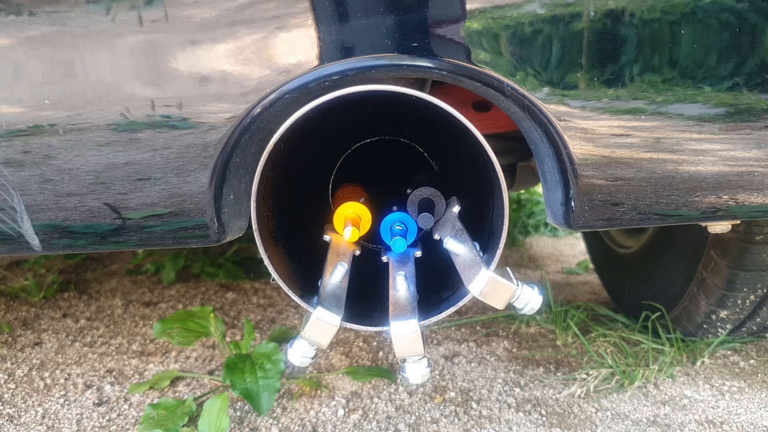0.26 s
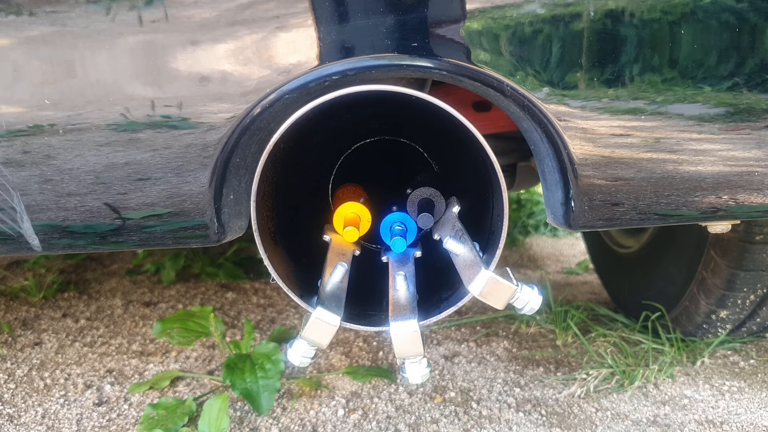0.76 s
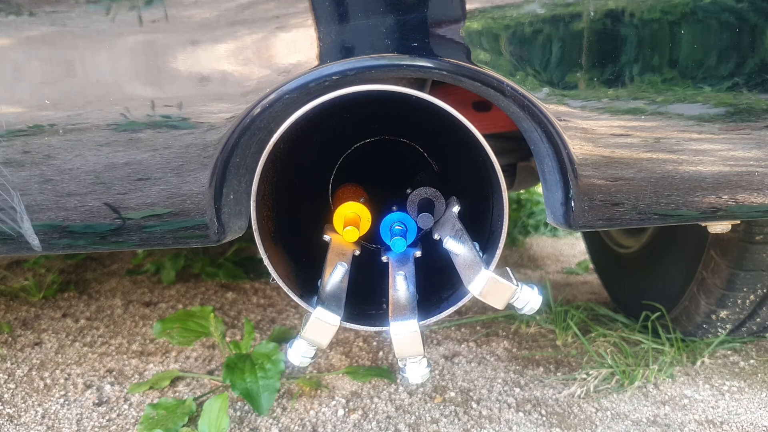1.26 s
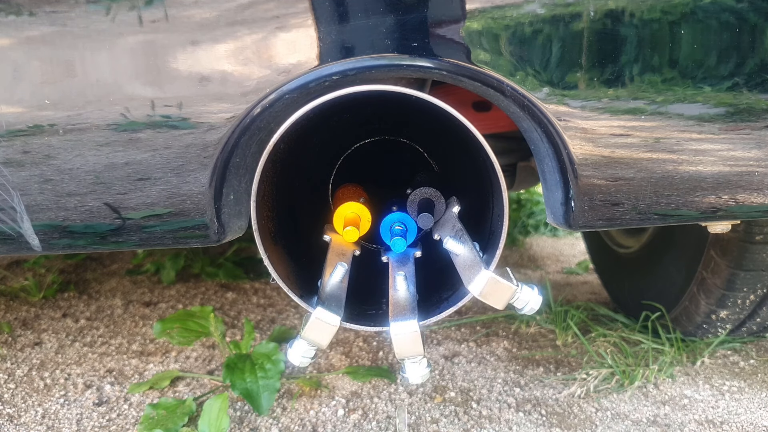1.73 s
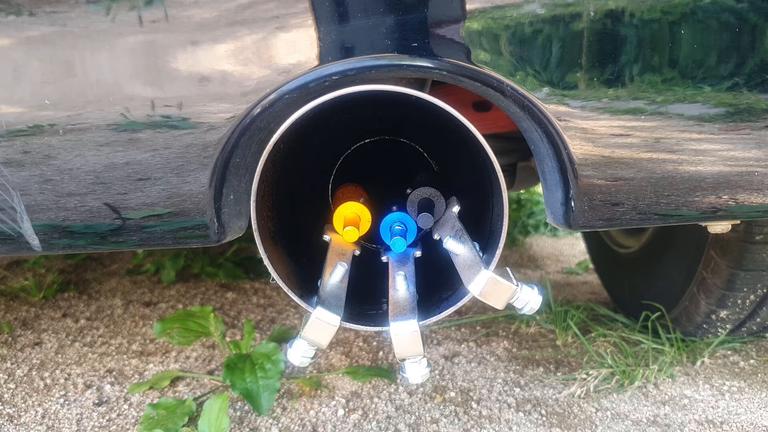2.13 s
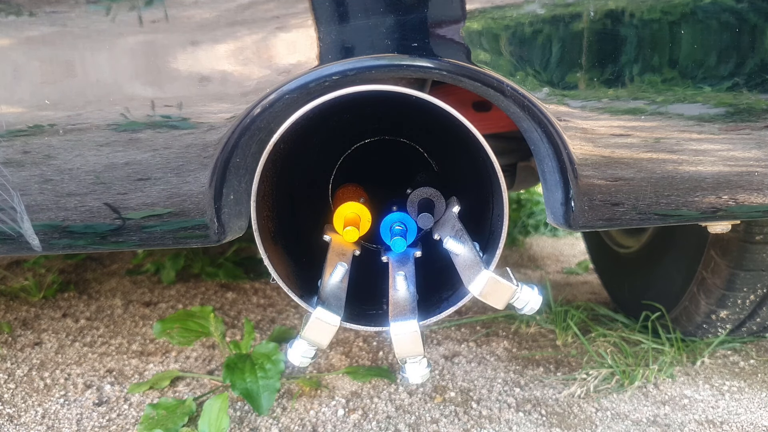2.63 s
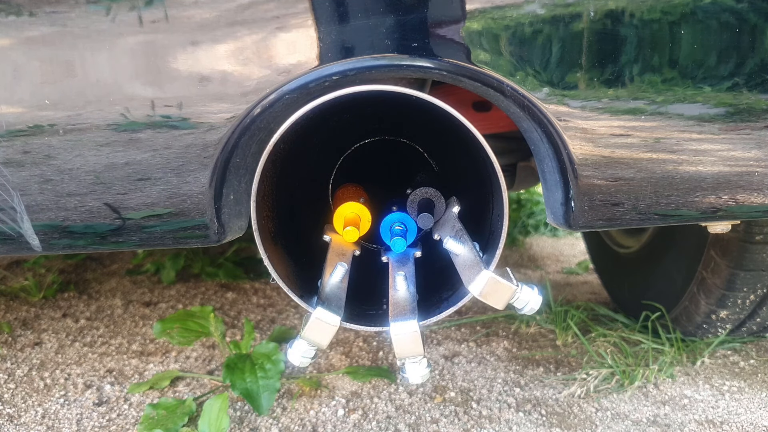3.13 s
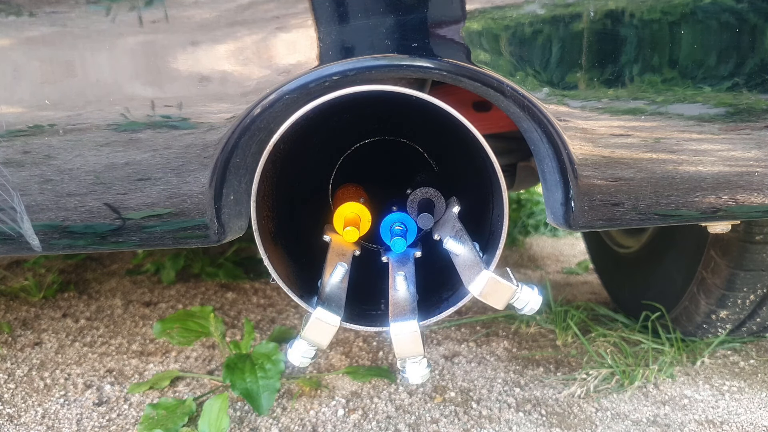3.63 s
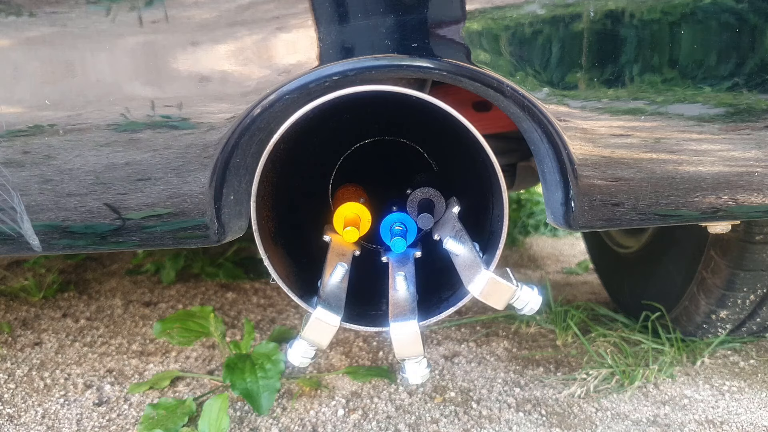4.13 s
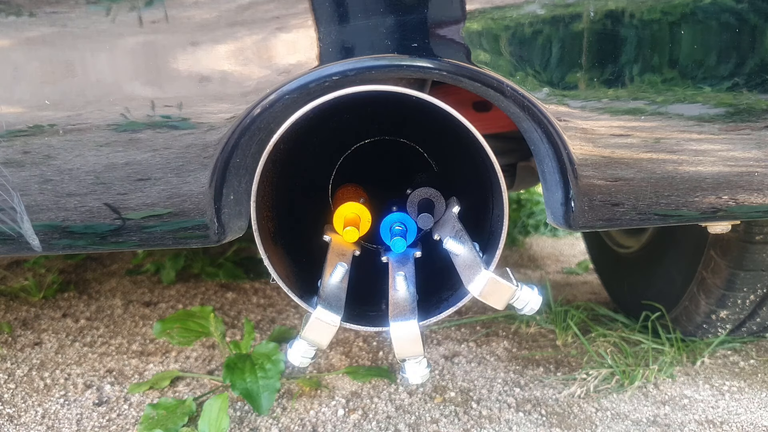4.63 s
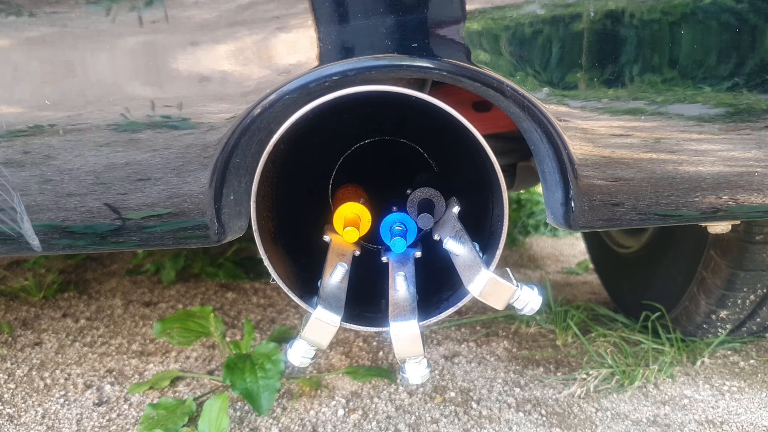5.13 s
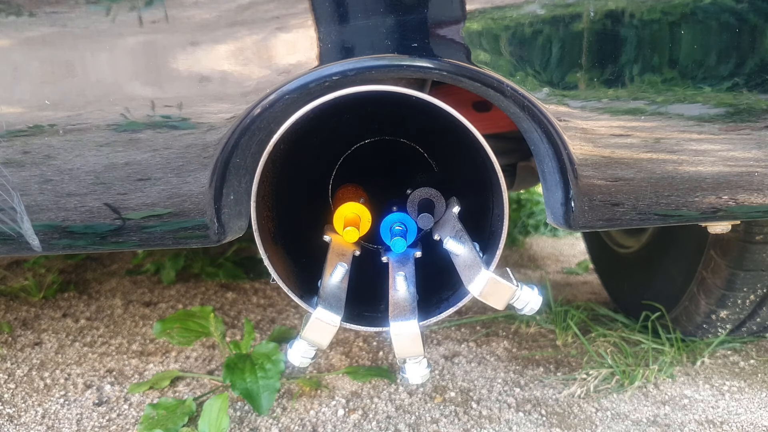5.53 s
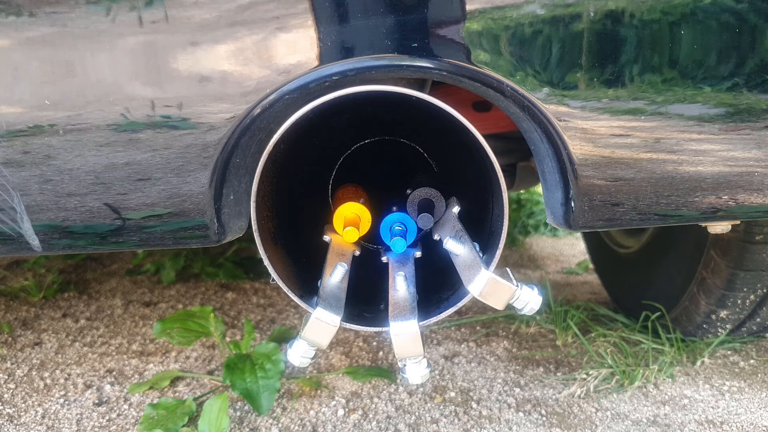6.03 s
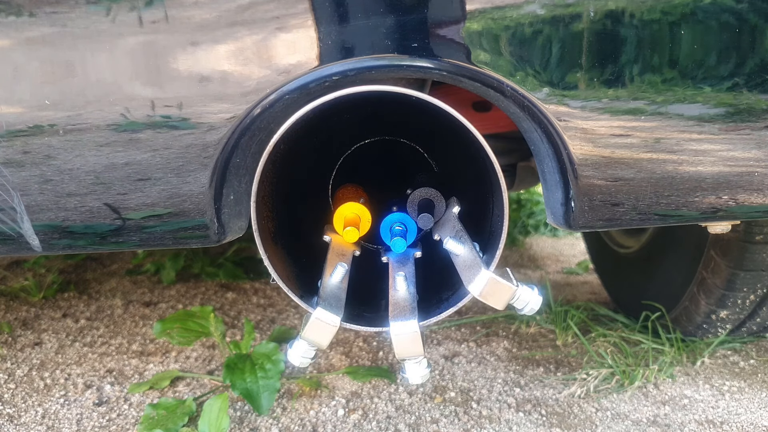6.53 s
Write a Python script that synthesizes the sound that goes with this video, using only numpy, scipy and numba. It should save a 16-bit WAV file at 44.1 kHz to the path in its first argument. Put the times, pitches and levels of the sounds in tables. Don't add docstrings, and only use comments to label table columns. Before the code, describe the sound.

A parked four-cylinder engine drops off a rev, idles with small birds chirping, then revs up hard as metal whistle inserts hiss and jingle in the tailpipe.

```python
import sys
import numpy as np
from scipy import signal
from scipy.fft import rfft, irfft, next_fast_len
from scipy.io import wavfile
from scipy.ndimage import uniform_filter1d
from numba import njit

SR = 44100
rng = np.random.default_rng(int(sys.argv[2]) if len(sys.argv) > 2 else 0)


def rack_gain(trim_db):
    fader = np.asarray(trim_db, float)
    return 10 ** (fader / 20)


def master_out(mix):
    frames = np.transpose(np.atleast_2d(mix))
    ceiling = np.clip(frames, -1, 1)
    pcm = np.round(ceiling * 32767).astype(np.int16)
    wavfile.write(sys.argv[1], SR, pcm)


N = 298557
T = np.arange(N) / SR


def curves(rows):
    s, *columns = np.transpose(rows)
    return [np.interp(T, s, column) for column in columns]


def over_hz(points, hz):
    f, v = np.transpose(points)
    return np.interp(np.log(hz), np.log(f), v)


def unit(x):
    return x / np.sqrt(np.mean(x ** 2))


@njit
def moving_bandpass(x, hz, width):
    y, band, low = np.empty(len(x)), 0., 0.
    for i in range(len(x)):
        g, damping = np.tan(np.pi * hz[i] / SR), width / hz[i]
        v = (band + g * (x[i] - low)) / (1 + g * (g + damping))
        band = 2 * v - band
        low = low + 2 * g * v
        y[i] = damping * v
    return y


def walk(rate):
    k = int(SR / rate)
    steps = np.repeat(rng.standard_normal(N // k + 1), k)
    return unit(uniform_filter1d(uniform_filter1d(steps, k), k)[:N])


def resonate(hz, modes, signs):
    total = 0
    for (f, width, db), sign in zip(modes, signs):
        loss = 1j * hz * width
        total = total + sign * rack_gain(db) * loss / (f * f - hz * hz + loss)
    return total


def ring(x, modes, signs):
    size = next_fast_len(N + SR)
    response = resonate(np.fft.rfftfreq(size, 1 / SR), modes, signs)
    return irfft(rfft(x, size) * response, size)[:N]


def pan(x, db):
    return x * rack_gain(np.array([[db], [-db]]) / 2)


def fit(s, held, db, rise, fall):
    return rack_gain(db + np.interp(T, [s - 2 * rise, s, s + held, s + held + 2 * fall], [-70, 0, 0, -70]))


# time [s], firing rate [Hz].
ENGINE_SPEED = [(0, 44.8), (.17, 42.1), (.53, 40.1), (1.28, 33.5), (1.68, 31.1), (2.09, 31.1), (2.5, 32.9),
                (3.36, 33.3), (3.64, 38.9), (4.13, 50.6), (4.6, 62.3), (5.03, 77.7), (5.26, 84.6),
                (5.47, 90.6), (5.64, 93.8), (5.88, 98.4), (6.3, 103.1), (6.77, 106.2)]


def firings():
    hz, = curves(ENGINE_SPEED)
    return hz, np.cumsum(hz) / SR + 0.1468


# time [s], load [dB], extra edge of the blowdown [dB].
THROTTLE = [(0, 2.5, -5.5), (.08, -2, -1), (.13, -7, -5), (.45, -5.5, -17.5), (.7, -6.5, -13.5),
            (.9, -8, -9.5), (1.15, -9.5, -6), (1.75, -9, -5), (2.1, -6, -4), (2.45, 0.1, -4),
            (3.33, -0.8, -1), (3.55, 0, 4.5), (3.82, 1, -2.5), (3.92, 0.5, 2), (5.25, -0.86, 7.5),
            (5.5, -0.6, 2.1), (6.25, -0.1, -3.5), (6.77, 3, -1.5)]
# pitch [Hz], level [dB].
FIRST_ORDER = [(31, -27.5), (35, -21), (41, -14), (47, -16.5), (55, -16.5), (70, -11.5), (82, -12),
               (100, -18)]
# pitch [Hz], level [dB].
SECOND_ORDER = [(62, -19), (77, -20.5), (84, -25), (100, -26.5), (122, -28.5), (156, -22.5), (185, -30.5),
                (205, -40)]
# pitch [Hz], level [dB].
THIRD_ORDER = [(99, -30.5), (108, -29), (132, -28.5), (150, -24), (202, -47.5), (254, -42.5), (276, -43.5),
               (318, -32.5)]
EDGE_SHARE = [0, 0.49, 0.78]
HIGH_ORDER_DB = [1.5, 0, -4.5, -4.5, -1, -4.5, -7, -12, -11.5, -30, -26, -13.5, -15.5, -22.5, -30.5, -13,
                 -32]
HALF_ORDER_DB = [-20, -24, -20, -18, -16, -18, -20, -22, -23, -24, -25, -26]
# pitch [Hz], width [Hz], level [dB].
PIPE = [(44.5, 11, 0.5), (69, 16.1, 5.5), (108.6, 26.3, 1.5), (152.3, 22.4, 0), (242, 43, -18),
        (324, 52, -10), (410.8, 26.2, 0.5), (611, 30.3, -11.5), (770, 15, -36), (974, 80, -25),
        (1070, 39, -45), (1310, 84, -32), (1863, 110, -21)]
PIPE_SIGN = [1, -1, 1, -1, -1, 1, -1, -1, 1, -1, 1, -1, 1]
# pitch [Hz], width [Hz], depth [dB].
TRAPS = [
    (234, 50, -6.5),
    (493, 100, -12.5),
    (787, 230, 2.5),
]
# pitch [Hz], phase [turns].
PIPE_LAG = [(34, 0.47), (38, 0.37), (46, 0.01), (62, -0.07), (80, -0.28), (105, -0.3), (135, -0.2),
            (170, -0.48), (200, -0.68), (240, -0.76), (300, -0.21), (385, -0.53), (440, -0.99), (650, -1.0)]


def exhaust(hz, turns):
    load_db, edge_db = curves(THROTTLE)
    grid = np.arange(5, 2500, .5)
    pipe = resonate(grid, PIPE, PIPE_SIGN) * (1 - resonate(grid, TRAPS, [1, 1, 1]))
    gain, lag = np.abs(pipe), 2 * np.pi * over_hz(PIPE_LAG, grid)
    timing = turns + .016 * (33 / hz) ** 2 * walk(25)

    def line(k):
        return np.sqrt(2) * np.cos(2 * np.pi * k * timing + np.interp(k * hz, grid, lag))

    out = np.zeros(N)
    low_orders = zip([1, 2, 3], [FIRST_ORDER, SECOND_ORDER, THIRD_ORDER], EDGE_SHARE)
    for k, passed, share in low_orders:
        db = load_db + share * edge_db + over_hz(passed, k * hz)
        out += rack_gain(db + 0.11 * k * walk(13)) * line(k)

    sharp_db = -27.5 + load_db + edge_db
    whole = [(k + 4, db, .8) for k, db in enumerate(HIGH_ORDER_DB)]
    halves = [(k + .5, db + 11.4 * (hz - 60) / 40, 4.2) for k, db in enumerate(HALF_ORDER_DB)]
    for k, db, flutter_db in whole + halves:
        out += rack_gain(sharp_db + db + flutter_db * walk(22)) * np.interp(k * hz, grid, gain) * line(k)

    locked = line(9) + rack_gain(-14) * line(10) + rack_gain(-12) * line(7) + rack_gain(-17) * (line(14) + line(18))
    out += rack_gain(-38 + 2.6 * (hz - 106) + 1.2 * walk(10)) * locked

    octaves = np.log2(hz / 33)
    puff = np.exp(-(turns % 1) / 1.3) * rng.standard_normal(N)
    floor_pan = [(207, 46, -2), (251.0, 40, -1), (568, 56, -4.5)]
    boom = unit(ring(rng.standard_normal(N), floor_pan, [1, -1, 1]))
    uneven = unit(ring(puff, PIPE, PIPE_SIGN)) + rack_gain(-9.5 - 3.7 * octaves) * boom
    return out + uneven * rack_gain(-41 + load_db + 5.5 * octaves)


# start [s], held [s], level [dB].
JINGLE = [
    [(0.0, 0.31, -65), (.29, .44, -61.5), (3.72, 0.35, -62), (5.09, .2, -71)],
    [(.27, 0.17, -60), (.48, 0.16, -67), (3.865, .135, -56), (5.1, .1, -71)],
    [(0.0, .1, -72), (.32, 0.37, -63.5), (3.8, .06, -69), (3.865, .16, -57), (4.33, .08, -71),
     (5.09, 0.084, -58.5)],
]


def shaking():
    return [sum(fit(*row, rise=0.06, fall=.07) for row in fits) for fits in JINGLE]


# time [s], level [dB].
FLOW = [(0, -61.5), (.02, -57.5), (.17, -63), (.47, -59), (.94, -62.5), (1.98, -58), (2.2, -52.5),
        (2.45, -49), (3.56, -51), (3.85, -55.5), (4.2, -53), (5.02, -51), (5.13, -47), (5.3, -46),
        (5.64, -44), (6.3, -42.5), (6.77, -38)]
# pitch [Hz], density [dB per Hz].
GAS_COLOUR = [(290, -38), (500, -8), (603, 1), (851, -4), (1070, 4), (1330, -22.5), (1880, -24.5),
              (2230, -17), (3580, -16.5), (5440, -26.5), (6280, -26), (7900, -8), (15500, -6.5)]
# pitch [Hz], correlation [-1 to 1].
LIKENESS = [(60, 0.99), (130, 0.99), (290, 1), (640, 0.31), (1410, 0.42), (3100, 0.14), (6820, -0.61),
            (15000, -0.43)]
# pitch [Hz], left minus right [dB].
LEFT_LEAN = [(60, 1.5), (110, 1.5), (200, 2.0), (380, 1.5), (700, 1.4), (1290, 4.6), (2380, 2.5),
             (4400, 5.8), (8120, 7.2), (15000, 1.5)]


def gas(turns):
    hiss_db, = curves(FLOW)
    over = hiss_db + 50.5
    roar_db = -53 + 0.89 * over + 0.38 * curves(THROTTLE)[1]
    top_db = -79 + np.where(over < 0, 3.9, 1.31) * over
    top_db = 20 * np.log10(rack_gain(top_db) + rack_gain(-20.5) * sum(shaking()))
    throb, swell, out = 1 + 0.062 * np.cos(2 * np.pi * turns), walk(3.22), 0
    # level, start of the bands, range that sets the level, end of the bands (Hz)
    groups = [(roar_db, 560, 700, 1300, 1500),
              (hiss_db, 1500, 2100, 6800, 7000),
              (top_db, 7000, 9600, 10200, 15600)]
    for flow_db, start, lo, hi, end in groups:
        total_db = 10 * np.log10(np.sum(rack_gain(2 * over_hz(GAS_COLOUR, np.arange(lo, hi)))))
        edges = np.geomspace(start, end, 6)
        for a, b in zip(edges, edges[1:]):
            centre = (a + b) / 2
            band = signal.butter(3, [a, b], "band", fs=SR, output="sos")
            mid, side = signal.sosfilt(band, rng.standard_normal((2, N)))
            like = np.clip(over_hz(LIKENESS, centre), 0, 1)
            opposed = unit(side) * np.array([[1], [-1]])
            pair = np.sqrt(1 + like) * unit(mid) + np.sqrt(1 - like) * opposed
            db = over_hz(GAS_COLOUR, centre) + 10 * np.log10(b - a) - total_db
            db = db + max(np.log2(a / 9000), 0) * .3 * (top_db + 71.5)
            gain = rack_gain(flow_db + db + 0.62 * swell + 0.97 * walk(15))
            out = out + pan(pair, over_hz(LEFT_LEAN, centre)) * gain
    return out * throb * rack_gain(-4.0)


# pitch [Hz], width [Hz], level [dB].
AIR_COLUMNS = [(872, 9, 6), (1290, 40, -4), (1470, 22, 1), (1930, 40, 0), (2440, 60, -1), (2620, 60, -2),
               (3340, 40, -3), (3670, 90, -3), (5000, 80, -7), (6270, 70, -4)]


def air_columns():
    hiss_db = curves(FLOW)[0]
    ports = []
    for _ in range(2):
        air = rng.standard_normal(N) * rack_gain(3.3 * walk(18))
        ports.append(unit(ring(air, AIR_COLUMNS, np.ones(len(AIR_COLUMNS)))))
    return pan(np.array(ports), 5.2) * rack_gain(hiss_db - 6)


# start [s], held [s], pitch [Hz], level [dB].
BREATH = [
    (0.0, .12, 1390, -62),
    (.35, 0.39, 1370, -62),
    (3.5, .8, 1570, -60.5),
    (3.97, 0.034, 1400, -54),
    (4.751, .6, 1660, -47.5),
    (5.499, 1.3, 1937, -51.5),
]


def whistles(turns):
    out = np.zeros((2, N))
    for s, held, centre_hz, db in BREATH:
        hz = centre_hz * (1 + 0.011 * walk(8))
        air = rng.standard_normal((2, N)) * (1 + 0.1 * np.cos(2 * np.pi * turns))
        ports = []
        for a in [air[0], 0.48 * air[0] + 0.98 * air[1]]:
            ports.append(unit(moving_bandpass(a, hz, 90.) + 0.26 * moving_bandpass(a, hz, 500.)))
        out += np.array(ports) * fit(s, held, db, rise=0.38, fall=0.25) * rack_gain(1.1 * walk(20))
    return pan(out, 4.8)


# pitch [Hz], width [Hz], level [dB].
INSERT_MODES = [(6270, 60, 0), (12090, 40, 0), (8910, 28, 2), (4980, 70, -5), (12380, 70, -4),
                (8080, 40, -7), (9390, 50, -2), (11100, 50, -9), (7460, 50, -14), (10380, 55, -8),
                (13000, 60, -13), (8240, 60, -7), (15000, 110, -17), (13800, 80, -15)]
# time [s], peak [dB], pitch [Hz].
SPITS = [
    (0.0464, -53.5, 1720),
    (0.0687, -45, 1280),
    (0.0922, -34, 1300),
    (0.1154, -34.5, 1360),
    (0.165, -55, 1350),
]


def inserts(turns):
    beat = np.exp(-((turns + .3) % 1) / 0.28)
    out = 0
    for k, (left_db, shake) in enumerate(zip([5., 1.5, -1.5], shaking())):
        struck = rng.random((3, N)) < 500 * beat / SR
        taps = struck * rng.standard_normal((3, N)) * rack_gain(1.2 * walk(11))
        modes = INSERT_MODES[k::3] + [(10500, 5800, -28)]
        signs = (-1.) ** np.arange(len(modes))
        ports = [ring(0.61 * taps[0] + side, modes, signs) for side in taps[1:]]
        out = out + pan(unit(np.array(ports)), left_db) * shake
    for s, db, hz in SPITS:
        burst = np.exp(-((T - s - .003) / 0.0056) ** 2) * rng.standard_normal(N)
        metal = [(1700, 500, 0), (hz, 900, -3), (5000, 1200, -3), (3000, 900, -7)]
        slap = ring(burst, metal, [1, -1, 1, -1])
        out += pan(slap / np.abs(slap).max() * rack_gain(db - 4.0), 3.7)
    return out


# pitch [Hz], width [Hz], level [dB].
DRONES = [
    (249.2, 3.5, -52.5),
    (411, 4.7, -56.5),
    (868, 1.5, -67.5),
    (1446, 12, -76),
    (58, 37, -52.5),
    (105, 50, -55),
]


def drones(hz):
    swell_db = 7.36 + 1.2 * curves(THROTTLE)[0] - 1.07 * np.clip(hz - 35, 0, 17)
    hums = [rack_gain(db) * unit(ring(rng.standard_normal(N), [(f, width, 0)], [1])) for f, width, db in DRONES]
    return pan(sum(hums) * rack_gain(swell_db), 3.6)


# time into the call [s], level [dB], pitch [Hz], length [s].
PHRASE = [
    (0, -1, 4110, 0.015),
    (.009, 0, 3960, 0.011),
    (0.028, -7, 4180, 0.015),
]
# start [s], peak [dB], left minus right [dB].
CALLS = [
    (2.459, -38, 9),
    (3.418, -38.5, 7.3),
]
# start [s], peak [dB], pitch [Hz], length [s], left minus right [dB].
CHIRPS = [
    (2.359, -49, 5450, 0.03, 8),
    (2.40, -58, 5700, 0.018, 8),
    (2.42, -54, 5420, .014, 6),
    (2.47, -54, 6150, 0.019, 10),
    (2.497, -45, 3110, .018, .1),
    (3.438, -46.5, 2890, .025, 2.1),
    (4.06, -56, 3700, 0.022, 6),
    (4.222, -61, 3400, .035, 2),
    (4.29, -48.5, 3810, .016, 5),
    (4.424, -55, 3660, .041, 17),
]
# time [s], peak [dB], pitch [Hz].
TICKS = [(0.2139, -63, 3520), (0.8235, -59, 3600), (1.279, -56, 3650), (1.4022, -61, 3670),
         (1.7823, -64, 3670), (1.9101, -61, 3550), (2.295, -59, 3680), (2.409, -57, 3630),
         (2.517, -53, 3600), (2.537, -52, 3660), (2.6943, -59, 3870), (2.7826, -53, 3660),
         (2.9033, -47, 3720), (3.0664, -54, 3740), (3.1448, -52, 3700), (3.2675, -51, 3730),
         (3.389, -49, 3570), (3.684, -55, 3730), (3.807, -51.5, 3670), (4.148, -67, 3740),
         (4.37, -49, 3670), (4.509, -57, 3630), (4.6962, -57, 3560), (4.8135, -50, 3600)]


def birds():
    out = np.zeros((2, N + SR))
    called = [(s + after, db + rel_db, hz, length, left_db)
              for s, db, left_db in CALLS for after, rel_db, hz, length in PHRASE]
    notes = [(*row, .09) for row in called + CHIRPS]
    notes += [(s - .004, db + 2.5, hz, .014, 2.5, 0) for s, db, hz in TICKS]
    for s, db, start_hz, length, left_db, fall in notes:
        n, at = int(length * SR), int(s * SR)
        wobble = uniform_filter1d(rng.standard_normal(2000), size=40)[:n] * np.sqrt(40)
        husk_hz = np.interp(db, [-50, -38], [70, 240]) * wobble
        hz = np.linspace(start_hz, start_hz * (1 - fall), n) + husk_hz
        note = np.hanning(n) * np.sin(2 * np.pi * np.cumsum(hz) / SR)
        out[:, at:at + n] += pan(note * rack_gain(db + 0.5), left_db)
    age = np.arange(4000) / SR
    echo = rng.standard_normal((2, len(age))) * np.exp(-age / 0.02) * rack_gain(-27.5)
    return (out + signal.fftconvolve(out, echo, axes=1)[:, :N + SR])[:, :N]


def scene():
    hz, turns = firings()
    note = pan(exhaust(hz, turns), 1.5)
    note[1] = np.interp(T - 1.35e-4, T, note[1])
    return note + gas(turns) + air_columns() + whistles(turns) + inserts(turns) + drones(hz) + birds()


def top_cut(x):
    return signal.sosfilt(signal.butter(12, 15670, fs=SR, output="sos"), x)


def record(dry):
    return top_cut(dry)


dry = scene()
out = record(dry)
master_out(out)
```